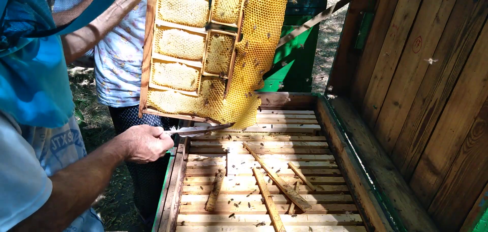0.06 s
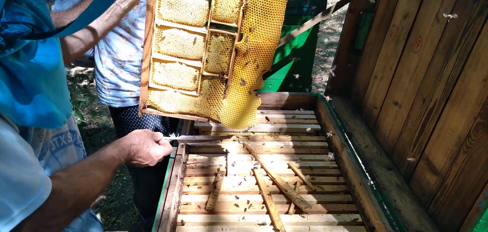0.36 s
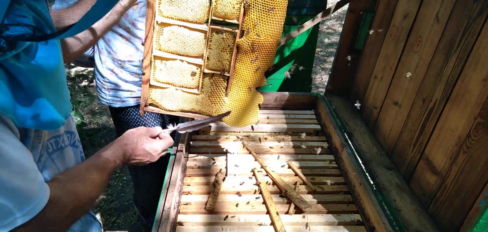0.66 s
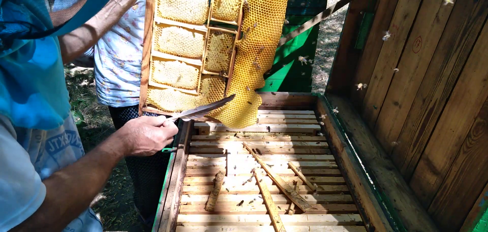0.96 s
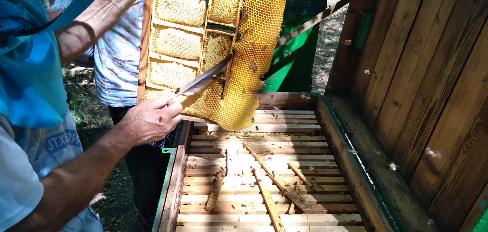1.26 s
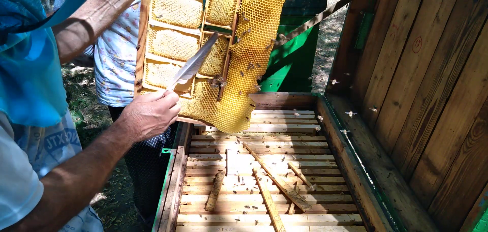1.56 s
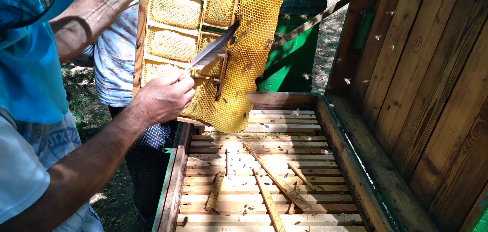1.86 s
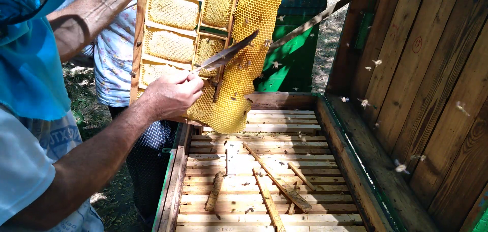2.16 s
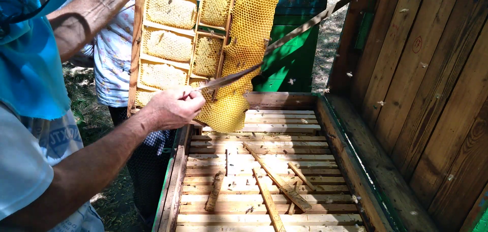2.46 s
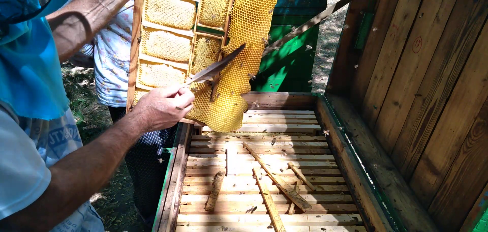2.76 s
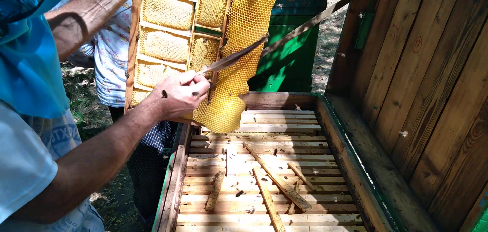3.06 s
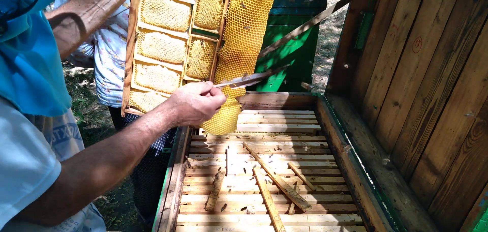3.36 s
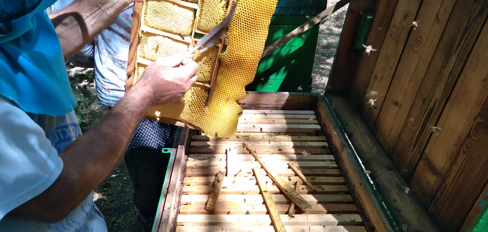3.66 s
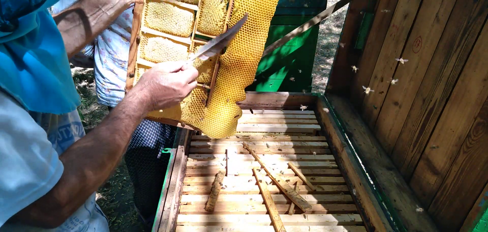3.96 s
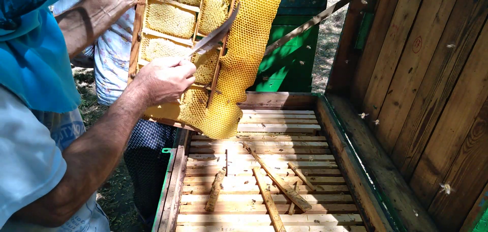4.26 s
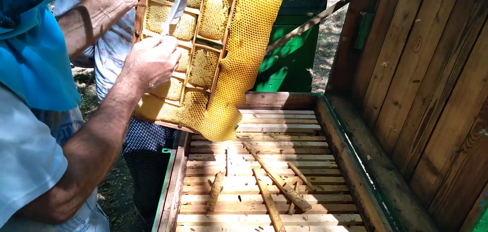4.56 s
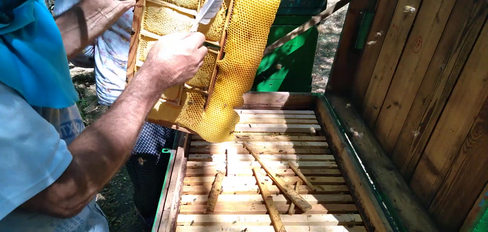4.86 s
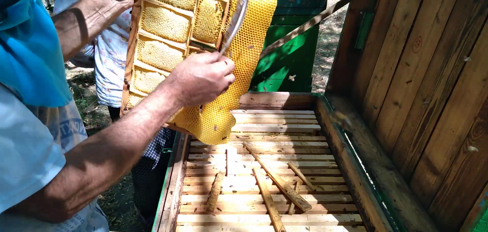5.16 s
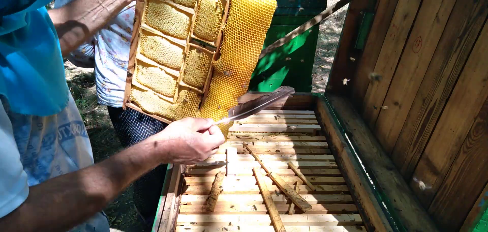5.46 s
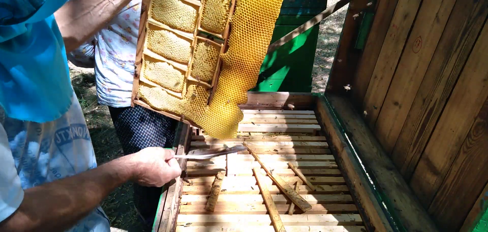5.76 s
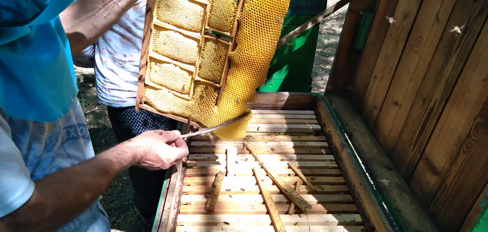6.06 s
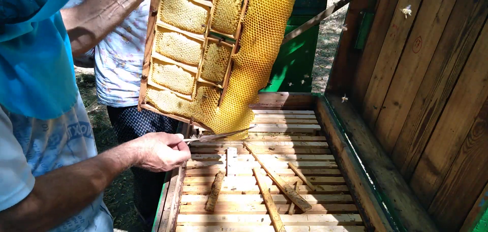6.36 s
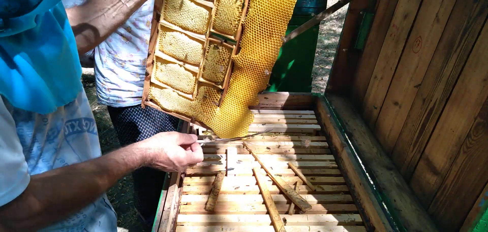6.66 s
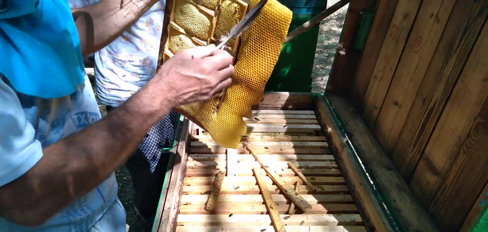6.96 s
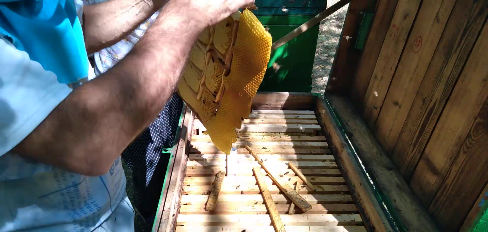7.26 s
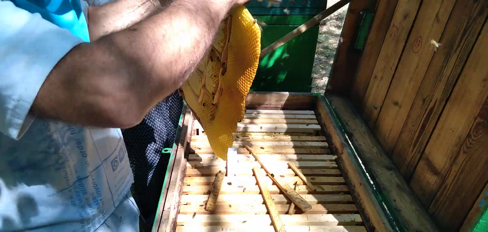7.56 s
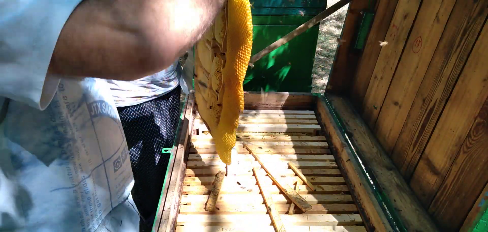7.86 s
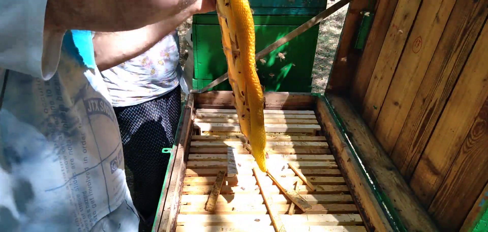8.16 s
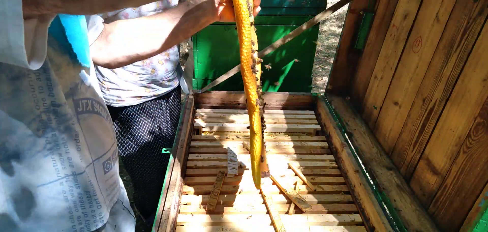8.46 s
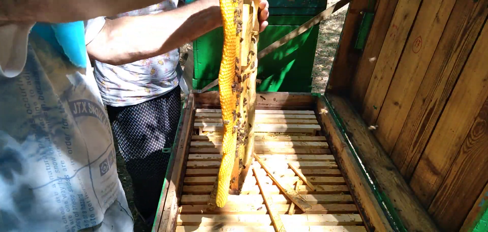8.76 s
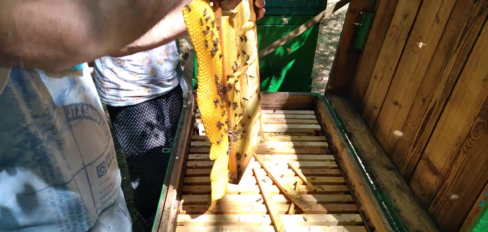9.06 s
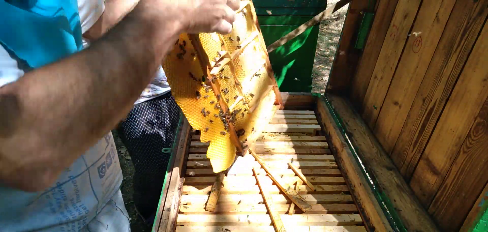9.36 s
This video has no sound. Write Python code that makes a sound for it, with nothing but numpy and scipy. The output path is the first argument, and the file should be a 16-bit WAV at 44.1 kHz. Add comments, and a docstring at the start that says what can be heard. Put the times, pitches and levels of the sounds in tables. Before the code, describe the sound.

Honeybees hum over an open wooden hive for the whole nine and a half seconds, a warm, wavering buzz heard close up outdoors, with a fine crackle of sticky wax and a thin hiss. Single bees pass close, for example around 1, 2.8, 4.8, 5.7 and 6.8 seconds. From the start a feather brushes the honeycomb in short, bright strokes, about three a second, each a crisp rasp with a slight high ring and a hissing tail. Faint low finger rubs and short, ticking midrange blips fall among them, and the level dips briefly between movements. From 5.5 seconds the comb is lifted and turned, giving soft, deep thumps and, from about 6 seconds, swells of low rumble on the microphone. The strokes fade and end near 6.5 seconds. Buzzing and handling continue, with the strongest thump and rumble at about 9 seconds.

```python
"""Honeybees hum over an open wooden hive throughout; sticky wax rustles and single bees pass close.
From the start a hand tool brushes over a honeycomb in short strokes: each rasps across the wax cells,
sets them ringing and slides on with a hiss, among low finger rubs and short, ticking midrange blips.
From 5.5 s the comb is lifted and turned, with soft thumps and swells of low rumble; the strokes
end near 6.5 s and the handling carries on. Between movements the level dips briefly."""
import sys
import numpy as np
from scipy import signal
from scipy.fft import rfft, irfft
from scipy.io import wavfile
from scipy.ndimage import uniform_filter1d, map_coordinates

SR = 44100
rng = np.random.default_rng(int(sys.argv[2]) if len(sys.argv) > 2 else 0)


def unload_audio(sound):
    """Save the sound as a 16-bit wav file, at the path given as the first command line argument."""
    columns = np.transpose(np.atleast_2d(sound))
    # keep every value between -1 and 1, then stretch to whole-number steps
    steps = np.round(np.clip(columns, -1, 1) * 32767)
    wavfile.write(sys.argv[1], SR, steps.astype(np.int16))


N = 414962
TIME = np.arange(N) / SR
WINGBEAT_HZ = 232.6


def undb(db):
    """Decibels to gain."""
    return 10 ** (np.asarray(db) / 20)


def unit(x):
    """Scale to rms 1."""
    return x / np.sqrt(np.mean(x ** 2) + 1e-20)


def steady(x, span_s=0.0033):
    """Level a texture so that its rms stays near 1 at every moment."""
    return x / np.sqrt(np.abs(uniform_filter1d(x ** 2, max(int(span_s * SR), 2))) + 1e-12)


def add(out, start_s, x):
    """Mix x into out from start_s."""
    i = max(int(start_s * SR), 0)
    out[i:i + len(x)] += x[:N - i]


def faders(table):
    """One gain curve for each dB column of a table."""
    times, *columns = np.transpose(table)
    return [undb(np.interp(TIME, times, db)) for db in columns]


def push(t, rise_s, fall_s):
    """Envelope that peaks at t = 0: a bell-shaped attack, then a decay."""
    return np.where(t < 0, np.exp(-(t / rise_s) ** 2), np.exp(-np.maximum(t, 0) / fall_s))


def walk(rate):
    """Smooth random wandering, spread near 1, about `rate` turns a second."""
    step = max(int(SR / rate), 2)
    held = np.repeat(rng.standard_normal(N // step + 2), step)[rng.integers(step):][:N]
    return 1.3 * uniform_filter1d(uniform_filter1d(held, step), step)


def snaps(size, rate, spread_db):
    """Random tiny clicks of very unequal strength, about `rate` a second."""
    hit = rng.random(size) < rate / SR
    return hit * rng.choice([-1, 1], size) * undb(spread_db * np.minimum(rng.exponential(size=size), 4))


def ring(modes, size=6000):
    """Sum of damped sines, each given as pitch_hz, t60_s, level_db."""
    t = np.arange(size) / SR
    return sum(undb(db) * np.sin(2 * np.pi * hz * t) * np.exp(-np.log(1000) * t / t60)
               for hz, t60, db in modes)


def colour(x, eq):
    """Shape x with a minimum-phase EQ curve; the result has rms 1."""
    hz, db = np.transpose(eq)
    size = 2 ** 13
    bins_hz = np.maximum(np.fft.rfftfreq(size, 1 / SR), 1)
    cepstrum = irfft(np.log(undb(np.interp(np.log(bins_hz), np.log(hz), db))))
    cepstrum[1:size // 2] *= 2
    cepstrum[size // 2 + 1:] = 0
    impulse = irfft(np.exp(rfft(cepstrum)))
    return unit(signal.fftconvolve(x, impulse)[:len(x)])


def swirl(x, depth_db, width_hz, span_s):
    """Keep the colour moving: narrow patches of the spectrum swell and fade."""
    size, hop = 1024, 256
    spectra = signal.stft(x, nperseg=size, noverlap=size - hop)[2]
    patches = rng.standard_normal(spectra.shape)
    for axis, spread in enumerate([width_hz * size / SR, span_s * SR / hop]):
        bell = signal.windows.gaussian(41, max(spread / 2, .1))
        patches = signal.fftconvolve(patches, np.expand_dims(bell, 1 - axis), mode="same")
    gain = unit(undb(depth_db * np.clip(unit(patches), -3, 1.8)))
    return signal.istft(spectra * gain, nperseg=size, noverlap=size - hop)[1][:len(x)]


def level_dips(depth_db, edge_s=0.0014, lead_rises=1.39, blip_hold_s=0.013):
    """The level is full for every listed stroke, swell, rub and blip, and dips briefly in between."""
    moves = [(peak - lead_rises * rise, peak + hold) for peak, rise, hold, *_ in BRUSH_STROKES]
    moves += [(start, start + length) for start, length, _ in RUMBLE_SWELLS + FINGER_RUBS]
    moves += [(start, start + blip_hold_s) for start, *_ in BLIPS]
    gain = np.full(N, undb(depth_db))
    for start, end in moves:
        gain[max(int(start * SR), 0):int(end * SR)] = 1
    return uniform_filter1d(gain, max(int(edge_s * SR), 1))


# Faint breeze on the microphone: time_s, level_db
BREEZE_LEVELS = [(0, -49), (1.25, -69.5), (1.8, -61), (2.1, -77), (5.1, -75), (5.3, -50), (7.8, -53.5),
                 (8.3, -57.5), (9.4, -36)]
# Low swells from movement and air: start_s, length_s, level_db
RUMBLE_SWELLS = [(0, 0.46, -42.5), (6.111, 0.44, -36.5), (6.63, 0.4, -39.5), (7.217, 0.17, -35.5),
                 (7.518, 0.27, -34.5), (8.504, .18, -35.5), (8.683, 0.95, -42), (8.819, 0.28, -38.5),
                 (9.028, 0.1, -23.5), (9.19, .14, -29)]
# Bass-heavy tone of the rumble: freq_hz, gain_db
RUMBLE_EQ = [(20, -23), (42, 1), (66, 8.5), (110, 2.5), (160, -6), (200, -4), (260, -26), (340, -31),
             (700, -65)]


def rumble(attack_s=0.0053, release_s=0.014, sag_db=-7):
    """Air buffets the microphone: over a faint breeze, each swell rises fast, sags and lets go."""
    level = faders(BREEZE_LEVELS)[0]
    for start, length, db in RUMBLE_SWELLS:
        swell = np.interp(TIME - start, [0, attack_s, length, length + release_s], [0, 1, undb(sag_db), 0])
        level = np.hypot(level, undb(db) * swell)
    buffets = undb(2.2 * walk(28))
    return level * buffets * colour(rng.standard_normal(N), RUMBLE_EQ)


# Crisp tone of crackling wax: freq_hz, gain_db
WAX_EQ = [(200, -2), (900, -4), (1700, -11), (2700, -5), (3600, -2.5), (4500, 2.5), (5400, -2), (6500, 4),
          (8200, 9), (10000, -2), (15000, 3.5)]


def wax_rustle():
    """Sticky wax rustles in a dense, uneven run of tiny ticks."""
    flicker = undb(2.5 * walk(22))
    ticks = colour(snaps(N, rate=5000, spread_db=4.5), WAX_EQ)
    return swirl(flicker * ticks, depth_db=8.5, width_hz=110, span_s=.035)


# Drifting centre of the hum: time_s, pitch_hz
HUM_DRIFT = [(.9, 485), (1.3, 463.5), (3.6, 482.6), (4.8, 474.1), (6.4, 494)]
# Warm body of the swarm: freq_hz, gain_db
HUM_EQ = [(110, -44), (155, 4), (200, -.5), (250, -9.5), (330, -2.5), (400, 2.5), (480, 2.5), (550, 0.5),
          (640, -17.5), (900, -50.5)]
# Nasal midrange of the swarm: freq_hz, gain_db
WHINE_EQ = [(150, -66.5), (630, -13), (740, -3), (860, -3), (1020, 5), (1280, 9), (1450, -1), (1900, -13),
            (5000, -34.5)]


def swarm(hum_gain, whine_gain, count=10, spread=.08, wander=.06, flutter=.02, rest_hz=475.5):
    """Each bee beats at its own pitch, wavers as it steers and swells as it flies by."""
    wings = np.zeros(N)
    for rank in np.linspace(-1, 1, count):
        hz = WINGBEAT_HZ * (1 + spread * rank + wander * walk(6) + flutter * walk(35))
        phase = np.cumsum(hz) / SR + rng.random()
        nearness = undb(4.5 * walk(10) + 3 * walk(55))
        wings += nearness * (phase % 1 - .5)
    beats = steady(np.diff(wings, prepend=wings[0]), span_s=0.1)  # one sharp push of air per wingbeat
    beats += undb(-11) * rng.standard_normal(N)  # the crowd inside the hive blurs into a rush
    beats = swirl(beats, depth_db=5.8, width_hz=110, span_s=.028)
    clock = np.cumsum(np.interp(TIME, *np.transpose(HUM_DRIFT)) / rest_hz)
    drift = lambda x: map_coordinates(x, [clock], order=1, mode="mirror")  # bends the whole swarm
    hum = drift(steady(colour(beats, HUM_EQ), span_s=0.069))
    whine = steady(colour(drift(beats), WHINE_EQ), span_s=.11)
    return hum_gain * hum + whine_gain * whine


# Bright edge of the nearest bees: freq_hz, gain_db
OVERTONE_EQ = [(900, -36), (1600, -1), (2700, 5), (5500, -19.5)]


def nearest_bees(count=2, spread=.06, harmonics=20):
    """The nearest bees stand out with high, wavering overtones that flare up as they turn."""
    out = np.zeros(N)
    for rank in np.linspace(-1, 1, count):
        hz = WINGBEAT_HZ * (1 + spread * rank + .04 * walk(10) + .017 * walk(70))
        phase = 2 * np.pi * np.cumsum(hz) / SR
        out += sum(np.cos(k * phase) for k in range(1, harmonics + 1))
    return swirl(colour(out, OVERTONE_EQ), depth_db=10, width_hz=130, span_s=.035)


# Single fly-bys: nearest_s, level_db, wingbeat_hz
FLY_BYS = [(0.902, -42.5, 240), (1.452, -50, 213.6), (2.75, -45.5, 249.3), (2.931, -52, 244.2),
           (4.799, -45, 234.8), (5.36, -51, 258.3), (5.71, -44, 244.9), (6.772, -45.5, 248.7),
           (6.949, -46.5, 251), (7.731, -55, 229.5), (8.734, -50.5, 249)]
# Tone of one close bee: freq_hz, gain_db
BUZZ_EQ = [(120, 0), (230, -2), (480, 9.5), (700, -14.5), (1150, -4), (1700, -11), (2800, -17.5),
           (5000, -73), (10000, -17)]


def passing_bees(pass_s=0.055, glide=.025, waver=.025, flutter=.007, scatter_s=0.0067):
    """A close bee swells as 1 / distance, sinks in pitch and stutters; the hive walls scatter its buzz."""
    wings = np.zeros(N)
    jitter = .005 * walk(250)
    steering = 1 + waver * walk(13) + flutter * walk(50) + jitter
    for nearest_s, db, hz in FLY_BYS:
        along = (TIME - nearest_s) / pass_s  # in units of the nearest distance
        distance = np.hypot(along, 1)
        phase = np.cumsum(hz * steering * (1 - glide * along / distance)) / SR
        wings += undb(db) / distance * np.exp(-(along / 4) ** 2) * (phase % 1 - .5)
    stutter = unit(undb(4 * walk(55)))
    t = np.arange(SR // 20) / SR
    walls = rng.standard_normal(len(t)) * np.exp(-t / scatter_s)
    beats = np.diff(wings, prepend=wings[0]) * stutter
    beats = unit(beats) + unit(signal.fftconvolve(beats, walls)[:N])
    level = np.sqrt(12 * np.mean(wings ** 2))  # a sawtooth has mean square 1 / 12
    return swirl(level * colour(beats, BUZZ_EQ), depth_db=5, width_hz=130, span_s=.035)


# Thin, airy top of the hiss: freq_hz, gain_db
HISS_EQ = [(200, -29), (1500, -30), (5500, -31), (8200, -18), (10500, -5.5), (12500, 7), (14000, 9),
           (15500, 12.5)]


def sliding_hiss(bed_gain, slide_db=-41, fall_s=0.049):
    """A bed of hiss swells as the tool slides on after each stroke; slow strokes slide longer."""
    slide = np.zeros(N)
    t = np.arange(SR) / SR - .2
    for peak_s, rise_s, *_ in BRUSH_STROKES:
        add(slide, peak_s + t[0], undb(slide_db) * push(t, rise_s, fall_s + rise_s))
    sizzle = undb(1.8 * walk(25)) * colour(rng.standard_normal(N), HISS_EQ)
    return np.hypot(bed_gain, slide) * swirl(sizzle, depth_db=5.5, width_hz=120, span_s=.04)


# Fader moves of the hive ambience: time_s, hum_db, whine_db, rustle_db, hiss_db
HIVE_LEVELS = [(0, -52.5, -52.5, -51, -42.5), (0.9, -47.5, -54, -62, -51.5), (1.75, -48, -52.5, -59.5, -49),
               (2.7, -47, -51, -60, -51), (3.3, -51, -50, -56, -45.5), (3.72, -53.5, -56.5, -57.5, -62),
               (3.95, -43, -52.5, -56, -51.5), (4.8, -50.5, -52.5, -55.5, -45.5),
               (5.4, -47, -50, -54.5, -48.5), (6.1, -53, -51.5, -54, -50), (6.9, -54, -57.5, -52.5, -66),
               (7.3, -53.5, -56.5, -54, -51), (7.7, -48, -50, -51.5, -50.5),
               (8.5, -56.5, -57.5, -56.5, -52), (9.4, -53.5, -55.5, -53.5, -52)]


def hive(overtone_db=-10):
    """The open hive as three stems: buzzing wings, hiss and rustling wax."""
    hum_gain, whine_gain, rustle_gain, hiss_gain = faders(HIVE_LEVELS)
    bees = swarm(hum_gain, whine_gain) + passing_bees()
    bees += undb(overtone_db) * whine_gain * nearest_bees()
    return bees, sliding_hiss(hiss_gain), rustle_gain * wax_rustle()


# Fingers shifting on the frame: start_s, length_s, level_db
FINGER_RUBS = [(0.15, 0.14, -48), (0.484, 0.09, -48.5), (1.274, 0.03, -41), (1.454, 0.19, -53),
               (3.28, 0.029, -45), (4.44, 0.054, -48), (4.97, 0.0725, -50), (5.189, 0.23, -49.5)]
# Low groan of rubbed wood: freq_hz, gain_db
GROAN_EQ = [(60, -30), (140, -27), (195, 8.5), (260, -4.5), (380, -54), (900, -56)]


def finger_rubs(edge_s=0.0097):
    """Fingers rub the frame, which answers with a short, low groan."""
    pressure = np.zeros(N)
    for start, length, db in FINGER_RUBS:
        pressure += undb(db) * np.interp(TIME - start, [0, edge_s, length, length + edge_s], [0, 1, 1, 0])
    return pressure * steady(colour(rng.standard_normal(N), GROAN_EQ), span_s=0.019)


# Hum-like partials of a blip: pitch_hz, t60_s, level_db
BLIP_PARTIALS = [(191, 0.082, -40), (478, 0.17, 15.5), (511, 0.11, 4.5), (720, 0.048, 2.5),
                 (1047, 0.073, 3), (1251, 0.023, 17.5), (2100, 0.027, 4)]
# Short midrange blips, each with a small tick: start_s, level_db, tick_offset_db
BLIPS = [(.657, -39, -14), (1.278, -39, -3), (1.867, -58, -18), (1.907, -40.5, 9), (2.177, -32.5, -6),
         (2.436, -40.5, -13), (2.486, -45, -12), (3.383, -37, -16), (3.418, -38, -18), (3.479, -38.5, -14),
         (3.999, -48, -12), (4.03, -33, -6), (4.717, -37.5, -4), (5.442, -32.5, -3), (6.064, -47, -15),
         (7.391, -40.5, -23), (7.844, -38, -8), (8.504, -52, 10)]


def hum_blips(burst_s=0.002, crackle_s=0.011, crackle_db=-4, tone_db=1.0, size=4000):
    """Short blips of hum-like midrange tone, each with a small, crackly tick."""
    out, partials = np.zeros(N), ring(BLIP_PARTIALS)
    t = np.arange(size) / SR - .025
    for start_s, db, tick_db in BLIPS:
        crackle = snaps(size, rate=900, spread_db=3) * push(t - burst_s, crackle_s, crackle_s)
        burst = rng.standard_normal(size) * push(t - burst_s, burst_s, burst_s)
        onset = unit(burst) + undb(crackle_db) * unit(crackle)
        tone, tick = signal.fftconvolve(onset, partials), colour(onset, WAX_EQ)
        add(out, start_s + t[0], undb(db + tone_db) * tone / np.abs(tone).max())
        add(out, start_s + t[0], undb(db + tick_db) * tick / np.abs(tick).max())
    return out


# Soft bumps of the comb being handled: start_s, level_db, pitch_hz
COMB_THUMPS = [(5.53, -19.5, 66), (6.13, -23.5, 76), (6.176, -23, 67.5), (6.903, -22.5, 82.5),
               (7.233, -20, 77), (7.596, -19, 76.5), (7.845, -29, 203), (8.376, -35.5, 83),
               (8.622, -18.5, 101.6), (9.056, -13, 77)]


def comb_thumps(t60_s=0.1, overtone_db=-9, attack_s=0.0063, size=12000):
    """The handled comb gives dull, padded bumps: a few low swings and a shorter overtone."""
    out = np.zeros(N)
    attack = 1 - np.exp(-(np.arange(size) / SR / attack_s) ** 2)
    for start_s, db, hz in COMB_THUMPS:
        body = ring([(hz, t60_s, db), (2.68 * hz, t60_s / 2, db + overtone_db)], size)
        add(out, start_s - attack_s / 2, attack * body)
    return out


# Open wax cells that ring like tiny pipes: pitch_hz
CELL_PITCHES = [6750, 6970, 7370, 7550, 8271, 8190, 8820]
# Tiny sharp ticks within the strokes: time_s, peak_db
STROKE_TICKS = [(0.466, -32), (1.08, -29.5), (1.097, -27), (3.542, -37), (4.146, -43), (6.442, -28)]


def stroke_ticks(decay_s=.002, size=600):
    """A tiny sharp tick stands out within a stroke, coloured by the cells."""
    out = np.zeros(N)
    fade = np.exp(-np.arange(size) / SR / decay_s)
    cells = ring([(hz, decay_s, 0) for hz in CELL_PITCHES], size)
    for time_s, db in STROKE_TICKS:
        tick = signal.fftconvolve(rng.standard_normal(size) * fade, cells)
        add(out, time_s - .001, undb(db) * tick / np.abs(tick).max())
    return out


# Bright swish over the cells: freq_hz, gain_db
SWISH_EQ = [(2500, -46), (6400, -29), (7400, 2), (8400, -6), (9600, -5.5), (11500, -15), (15500, -9)]
# Rougher rasp of the brushing stroke: freq_hz, gain_db
RASP_EQ = [(150, -38), (900, -56), (2200, -10.5), (4500, -4.5), (5600, -10), (6500, -8), (9000, -52)]
# Strokes: peak_s, rise_s, full_level_s, level_db, ring_centre_hz, ring_mix_db, rasp_offset_db
BRUSH_STROKES = [(0.209, 0.05, 0.25, -40, 8400, 0.5, 1), (0.479, 0.02, 0.1693, -30, 8300, -12, -2.5),
                 (0.787, 0.0094, 0.22, -34.5, 8300, -4, 0.5), (1.079, 0.0029, 0.18, -30.5, 7960, -3, -7),
                 (1.342, 0.016, 0.195, -39, 7260, 7, -6), (1.606, 0.0047, 0.034, -41.5, 7500, -1, -2),
                 (1.944, 0.019, 0.15, -36, 7870, -5, 4), (2.218, 0.019, 0.18, -38, 8000, -3, 8),
                 (2.522, 0.01, .26, -34, 7800, -1.5, 5.5), (2.805, 0.049, 0.16, -48, 7800, -6, 0),
                 (3.113, 0.015, 0.23, -37, 7405, -3.5, 1), (3.552, 0.018, 0.099, -32, 7600, -5, -4),
                 (3.828, 0.0067, 0.13, -33.5, 8160, -2, -0.5), (4.15, 0.0085, 0.12, -36.5, 7600, 3.5, 6.5),
                 (4.475, 0.013, 0.17, -39, 8300, -5, 2.5), (4.791, 0.053, 0.15, -57, 8300, 9, 0),
                 (5.07, 0.011, .28, -31, 7700, -10.5, 0.5), (5.659, 0.12, 0.22, -48.5, 7800, -15, 3),
                 (6.221, 0.015, 0.17, -43.5, 6660, -11, 5), (6.441, 0.0094, 0.097, -41, 7800, 3, 11)]


def brush_strokes(ring_t60_s=0.15, width_hz=600, tail_s=0.069, tail_db=-12, scatter_s=0.0035,
                  rasp_db=-10, crisp_db=-9):
    """The tool brushes over cell walls in a dense run; which cells ring most shifts with each stroke."""
    out = np.zeros(N)
    t = np.arange(SR // 2) / SR - .15
    after_peak = np.maximum(t, 0)
    for peak_s, rise_s, _, db, centre_hz, ring_db, rasp_offset_db in BRUSH_STROKES:
        fall_s = 0.018 + 0.26 * rise_s  # pressure dies away more slowly after a slow rise
        tail = undb(tail_db) * (1 - np.exp(-after_peak / fall_s)) * np.exp(-after_peak / tail_s)
        envelope = undb(db) * (push(t, rise_s, fall_s) + tail)
        catches = snaps(len(t), rate=2000, spread_db=3.2)
        pitches = np.array(CELL_PITCHES) * (1 + .008 * rng.standard_normal(len(CELL_PITCHES)))
        modes = [(hz, ring_t60_s, -10 * np.log10(1 + ((hz - centre_hz) / width_hz) ** 4)) for hz in pitches]
        ringing = unit(signal.fftconvolve(catches, ring(modes))[:len(t)])
        # each catch is heard crisply, then scattered by the hollow cells for a few milliseconds
        scatter = rng.standard_normal(len(t)) * np.exp(-(t - t[0]) / scatter_s)
        grit = unit(signal.fftconvolve(catches, scatter)[:len(t)]) + undb(crisp_db) * unit(catches)
        swish = colour(grit, SWISH_EQ) + undb(rasp_db + rasp_offset_db) * colour(grit, RASP_EQ)
        swish = unit(swirl(swish, depth_db=5.5, width_hz=150, span_s=.08))
        add(out, peak_s + t[0], envelope * steady(swish + undb(ring_db) * ringing))
    stick_slip = undb(2.4 * walk(200))  # the tool slips from one row of cells to the next
    return out * stick_slip


def scene():
    """Hive, rumble, handling and brushing, all close to one microphone."""
    bees, hiss, rustle = hive()
    low_end = rumble()
    air = undb(-79) * rng.standard_normal(N)  # fine, even outdoor hiss
    accents = hum_blips() + stroke_ticks() + finger_rubs() + comb_thumps()
    bed = (bees + rustle) * level_dips(depth_db=-9)
    action = (hiss + low_end + brush_strokes()) * level_dips(depth_db=-10.5)
    return (air + bed + accents + action)[None]


def record(dry, low_cut_hz=48, high_cut_hz=15800):
    """The microphone sheds the deepest bass and the recorder cuts the top steeply."""
    dry = signal.sosfilt(signal.butter(2, low_cut_hz, "highpass", fs=SR, output="sos"), dry)
    return signal.sosfilt(signal.ellip(12, .2, 80, high_cut_hz, fs=SR, output="sos"), dry)


dry = scene()
out = record(dry)
unload_audio(out)
```